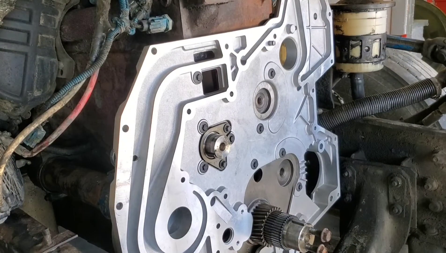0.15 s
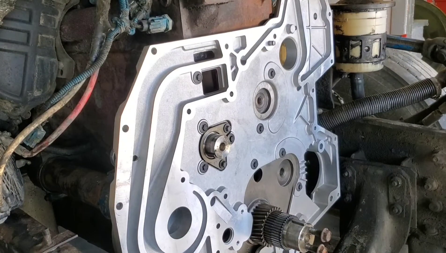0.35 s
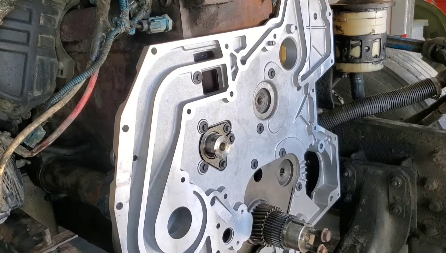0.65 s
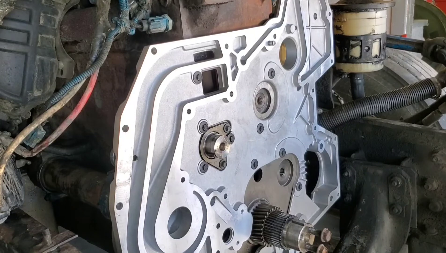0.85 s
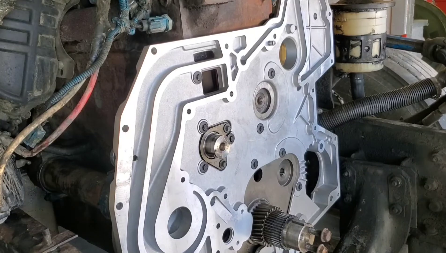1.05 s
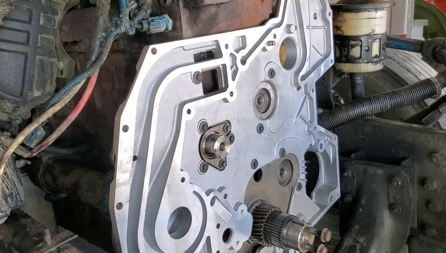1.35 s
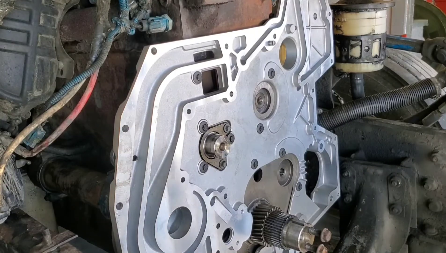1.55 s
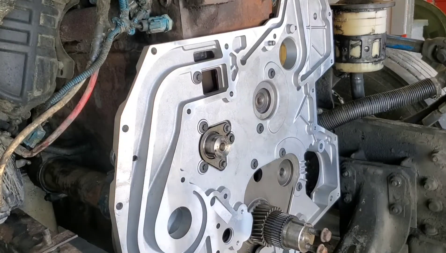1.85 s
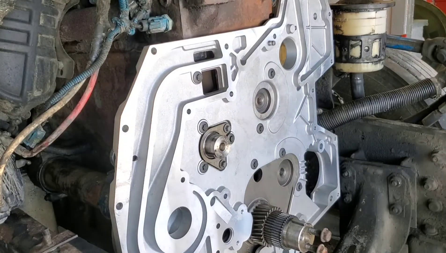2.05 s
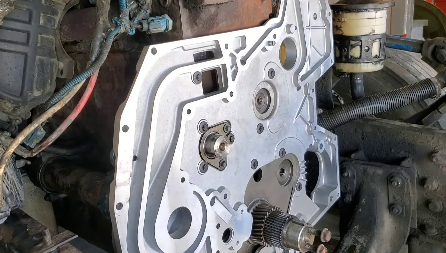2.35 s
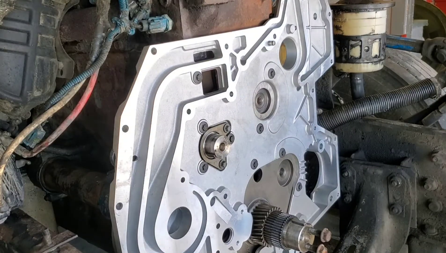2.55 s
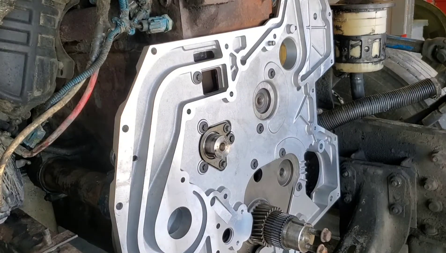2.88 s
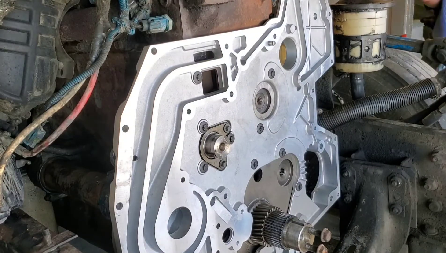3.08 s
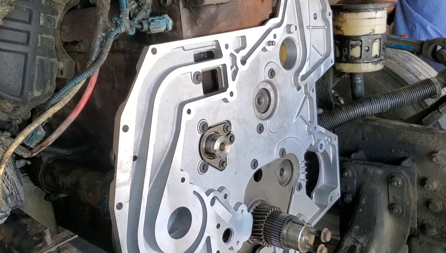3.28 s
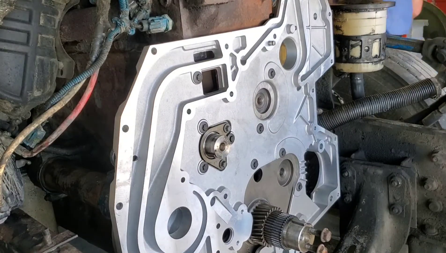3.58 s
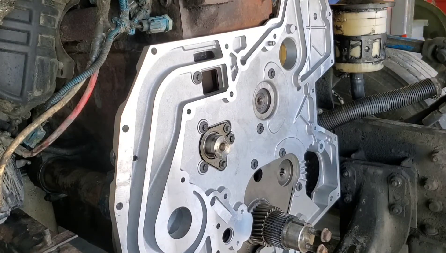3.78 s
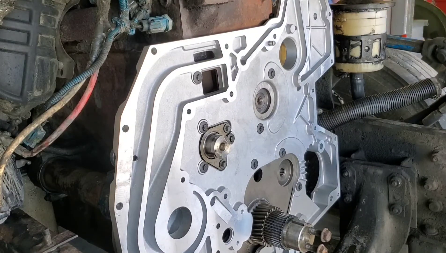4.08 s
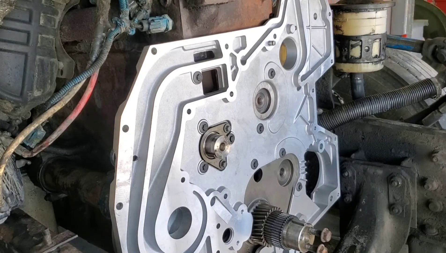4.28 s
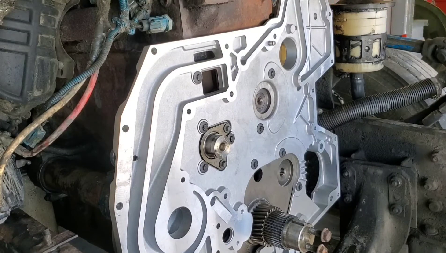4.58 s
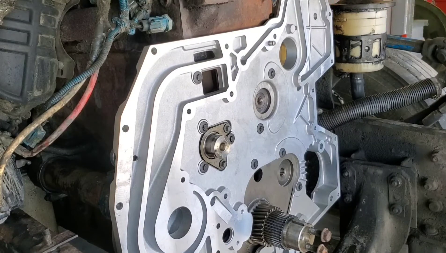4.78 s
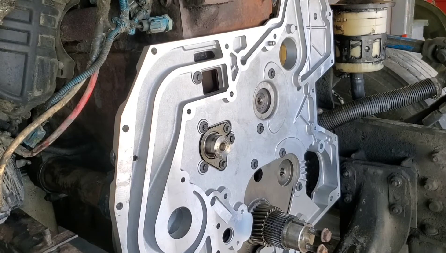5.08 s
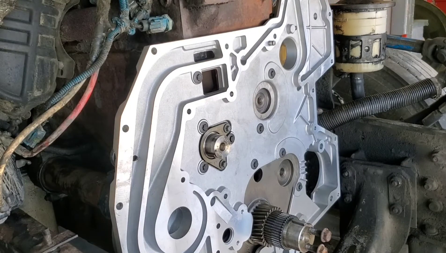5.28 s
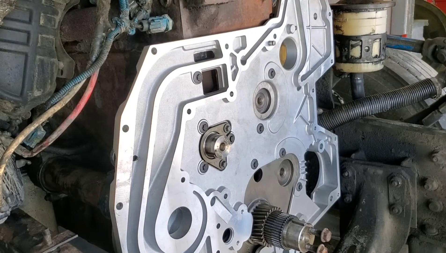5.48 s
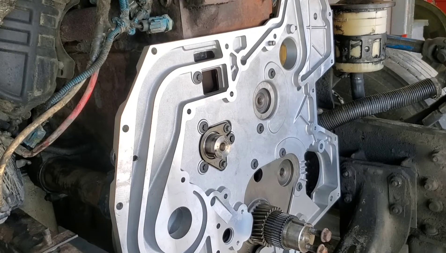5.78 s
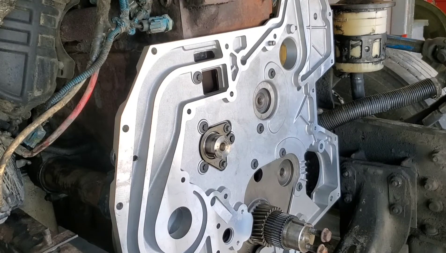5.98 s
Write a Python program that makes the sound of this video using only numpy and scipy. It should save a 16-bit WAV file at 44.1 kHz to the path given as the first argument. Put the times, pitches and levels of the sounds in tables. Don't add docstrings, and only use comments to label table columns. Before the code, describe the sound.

Workshop hum with soft cloth rustle and light metal ticks, faint sparrow chirps, then a dull clattering knock and scrape of heavy metal.

```python
import sys
import numpy as np
from scipy import signal
from scipy.fft import rfft, irfft, next_fast_len
from scipy.io import wavfile
from scipy.ndimage import uniform_filter1d

SR = 44100
rng = np.random.default_rng(int(sys.argv[2]) if len(sys.argv) > 2 else 0)


def transcribe(u):
    v = np.clip(np.atleast_2d(u).T, -1, 1)
    q = np.round(v * 32767).astype(np.int16)
    wavfile.write(sys.argv[1], SR, q)


def how_loud(loudness_db):
    steps = np.asarray(loudness_db, float) / 20
    return 10 ** steps


N = 270523
T = np.arange(N) / SR


def unit(x):
    return x / np.sqrt(np.mean(x ** 2))


def colour(x, table):
    size = next_fast_len(N)
    hz, db = np.transpose(table)
    bins_hz = np.arange(size // 2 + 1) * SR / size
    gain = how_loud(np.interp(np.log(bins_hz + 1), np.log(hz), db))
    return irfft(rfft(x, size) * gain, size)[..., :N]


def band(x, lo_hz, hi_hz):
    sos = signal.butter(2, [lo_hz, hi_hz], "band", fs=SR, output="sos")
    return unit(signal.sosfilt(sos, x))


def walk(rate_hz):
    k = int(SR / rate_hz)
    held = np.repeat(rng.standard_normal(N // k + 1), k)
    return 1.65 * uniform_filter1d(uniform_filter1d(held, k), k)[:N]


def grit(rate_hz, scatter_db, tail_s, bed):
    happens = rng.random(N) < rate_hz / SR
    slips = happens * how_loud(scatter_db * np.minimum(rng.exponential(size=N), 2))
    gate = signal.lfilter([1], [1, -np.exp(-1 / (tail_s * SR))], slips)
    return rng.standard_normal((2, N)) * (bed + unit(gate))


def even(x, span_s):
    return x / np.sqrt(uniform_filter1d(x ** 2, int(span_s * SR)) + 0.00103)


def modes(x, table, steady_s=0.54, count=1):
    out = 0
    for hz, db, t60 in table:
        r = np.exp(-np.log(1000) / (t60 * SR))
        poles = [1, -2 * r * np.cos(2 * np.pi * hz / SR), r * r]
        ring = x
        for _ in range(count):
            ring = unit(signal.lfilter([1, 0, -1], poles, ring))
        out = out + how_loud(db) * even(ring, steady_s)
    return unit(out)


def swells(starts, holds, dbs, rise_db_s, fall_db_s, bite_s=0, bite_db=0):
    t = T[::64]
    on = np.array(starts)[:, None]
    release = on + bite_s + np.array(holds)[:, None]
    dig = bite_db * np.clip(1 - (t - on) / max(bite_s, 1e-4), 0, 1)
    rise = rise_db_s * np.maximum(on - t, 0)
    fall = fall_db_s * np.maximum(t - release, 0)
    gains = how_loud(np.array(dbs)[:, None] + dig - rise - fall)
    return np.interp(T, t, gains.sum(axis=0))


def compressor():
    # (t/s, turns per second/Hz)
    shaft = [(0, 12.291), (1.3, 12.283), (2.7, 12.274), (4, 12.262), (6.14, 12.254)]
    orders = [(3, -83), (4, -41), (5, -74), (6, -91), (7, -61.5), (8, -40), (9, -56.5), (10, -65),
              (11, -59), (12, -53.5), (13, -61), (14, -66.5), (15, -63), (16, -69), (17, -60), (19, -58),
              (20, -62), (21, -56), (23, -71), (25, -64.5), (26, -85), (27, -62), (28, -68), (30, -74.5),
              (32, -68.5), (34, -104.5)]
    first_stroke_s, stroke_skew_rad = .0084, .49
    speed_hz = np.interp(T, *np.transpose(shaft))
    angle = 2 * np.pi * (np.cumsum(speed_hz) / SR - shaft[0][1] * first_stroke_s)
    out = 0
    for k, db in orders:
        start = rng.random() * 2 * np.pi
        if k % 4 == 0:
            start = np.pi + stroke_skew_rad
        out = out + how_loud(db + 0.51 * walk(2.4)) * np.sqrt(2) * np.cos(k * angle + start)
    return out


def fan():
    # (f/Hz, rms level/dB)
    tones = [(40, -60.5), (59.3, -59), (74.8, -66), (80.1, -50), (120, -71.5), (240, -70.5), (292, -64.5),
             (339.1, -70), (1621, -89), (5761, -80)]
    out = 0
    for hz, db in tones:
        level = how_loud(db + 1.2 * walk(2.8))
        out = out + level * np.sqrt(2) * np.cos(2 * np.pi * (hz * T + rng.random()))
    return out


def air():
    # (f/Hz, level/dB per Hz)
    air_colour = [(25, -27), (45, -4), (72, 0), (105, -0.5), (150, -9), (250, -16), (430, -15),
                  (800, -17.5), (1240, -25), (1570, -24), (3260, -32), (5280, -44), (6800, -45),
                  (7600, -55), (15500, -64)]
    # (f/Hz, level/dB, t60/s)
    duct_modes = [(1487, 0, 0.068), (1615, 1, 0.13), (1992, 1.5, 0.026), (3280, -14, 0.024)]
    white = rng.standard_normal((3, N))
    noise = unit(colour(white, air_colour))
    low = signal.sosfilt(signal.butter(2, 400, fs=SR, output="sos"), noise)
    ducts = how_loud(-18.5) * band(modes(white[::-1], duct_modes), 1270, 3500)
    bass = low * how_loud(2.4 * walk(2.3))
    treble = (noise - low + ducts) * how_loud(.5 * walk(7.8))
    return how_loud(-49) * (bass + treble)


def cloth_gains(moves, rise_db_s, falls_db_s):
    s, held, rub_db, hiss_db, fine_db = np.transpose(moves)
    swish_db = -61 + 0.41 * (rub_db + 54.5)
    levels = rub_db, rub_db + hiss_db, rub_db + hiss_db + fine_db, swish_db
    return np.array([swells(s, held, db, rise_db_s, fall) for db, fall in zip(levels, falls_db_s)])


def cloth():
    # (f/Hz, level/dB per Hz)
    fibre_colour = [(300, -4), (700, -6), (1400, -6.5), (2500, -1), (4000, -3), (6500, -13), (7500, -21),
                    (9500, -19.5), (12000, -28.5), (15500, -27.5)]
    # (t fully on/s, held/s, rub level/dB, hiss against rub/dB, fine hiss against hiss/dB)
    snap_moves = [(.205, 0.02, -63.5, -7.5, -18), (.512, 0.03, -65.5, -7.5, -17),
                  (.775, 0.047, -59.5, -13, -9), (1.218, 0.0088, -69.5, -10, -14),
                  (1.268, 0.0095, -76, -28, -10), (1.355, 0.036, -61, -8.5, -2),
                  (1.548, 0.012, -56, -19, 1), (1.45, 0.1, -71.5, -10, -12), (1.82, 0.072, -71, -5.5, -13),
                  (2.27, 0.015, -68.5, -9.5, -4), (3.04, 0.046, -65.5, -12.5, -7.5),
                  (3.9, 0.078, -69.5, -10, -5), (4.572, 0.057, -58.5, -16, -9), (6.102, .03, -60.5, -8, -4)]
    stroke_moves = [(0, 0.013, -65, -2, -2), (.12, 0.057, -78, -4, -11), (.34, 0.037, -73, 0, -9),
                    (.45, 0.048, -74.5, -4, -8), (.6, 0.15, -62.5, -13.5, -4),
                    (1.05, 0.036, -73, -1.5, -13), (2.15, 0.027, -61.5, -11, -4.5),
                    (2.46, .05, -78.5, -26, -5), (2.66, .13, -72, -14.5, 1), (3.33, 0.13, -64, -17, -2.5),
                    (3.66, 0.042, -67, -23.5, -2), (4.0, 0.043, -59.5, -8.5, -10),
                    (4.165, 0.041, -59, -3, -3.5), (4.25, 0.088, -44, -29.5, 5.5),
                    (4.31, 0.054, -56.5, -5.5, -1), (5.7, 0.095, -75, -23, -9),
                    (5.936, 0.21, -58.5, -11, -11)]
    fibres = colour(grit(1200., scatter_db=3., tail_s=.001, bed=1.5), fibre_colour)
    snaps = cloth_gains(snap_moves, rise_db_s=1600, falls_db_s=(107, 101, 150, 64))
    strokes = cloth_gains(stroke_moves, rise_db_s=195, falls_db_s=(156, 150, 200, 70))
    rub, hiss, fine, swish = snaps + strokes
    out = rub * band(fibres, 1250, 6800) - hiss * band(fibres, 6800, 10800)
    return out + fine * band(fibres, 10800, 18000) - swish * band(fibres, 330, 1250)


def ticks():
    # (t/s, peak level/dB, ring f/Hz, decay t60/s, bright edge level/dB)
    finger_ticks = [(0.2038, -37, 2480, 0.027, -10), (0.511, -40, 3220, 0.066, -22),
                    (0.568, -46.5, 2200, 0.023, -28), (0.6065, -43, 2790, 0.029, -27),
                    (0.6374, -43, 3420, 0.03, -22), (0.6636, -38, 2240, 0.03, -20),
                    (0.7196, -33.5, 2610, 0.026, -30), (0.776, -37, 2530, 0.024, -32),
                    (1.2183, -41, 1600, 0.057, -19), (1.2314, -56, 1900, 0.03, -21),
                    (1.27, -38.5, 3470, 0.034, -42), (1.3545, -33.5, 3250, 0.019, -12),
                    (1.394, -37, 3250, 0.019, -30), (1.445, -44, 3300, 0.036, -25),
                    (1.515, -48, 3200, 0.027, -28), (1.5484, -29, 2130, 0.046, -23),
                    (1.5614, -32, 2800, 0.04, -35), (1.575, -34, 3260, 0.035, -13),
                    (2.173, -42, 2620, 0.041, -30), (4.5724, -47, 2270, 0.027, -32),
                    (6.1, -49, 2200, 0.032, -14)]
    length = 4096
    out, t = np.zeros((3, N + length)), np.arange(length) / SR
    for s, db, hz, t60, edge_db in finger_ticks:
        burst = rng.standard_normal((3, length)) * np.exp(-np.log(1000) * t / max(t60, .005))
        ring = band(band(burst, hz * .72, hz * 1.35), 900, 5500)
        ring = ring + how_loud(edge_db) * band(burst, 7500, 11000)
        first = int(s * SR)
        out[:, first:first + length] += how_loud(db - 4.5) * ring / np.abs(ring).max()
    return out[:, :N]


def bumps():
    # (t/s, level/dB, f/Hz, t60/s)
    pushes = [(.625, -49, 436, 0.19), (1.218, -47, 1360, 0.071), (1.44, -51, 500, .15),
              (2.155, -57, 3250, .15), (1.551, -46, 3220, .12), (1.565, -46, 2750, .1),
              (4.575, -47, 1510, 0.13), (4.872, -32, 558, 0.13), (4.875, -38, 756, .12),
              (4.905, -41, 1026, .15), (5.212, -37, 640, 0.13), (5.214, -34.5, 1390, 0.15),
              (5.255, -39, 826, .15), (5.305, -36.5, 1395, 0.13), (5.505, -37.5, 285.6, .35),
              (5.508, -44, 742, .2), (5.825, -44, 358, 0.43), (5.951, -44, 296, 0.42),
              (5.985, -46, 372, .4), (5.98, -50, 518, 0.28)]
    push_s = 0.0025
    out = np.zeros((2, N))
    for (s, db, hz, t60), start in zip(pushes, rng.random((len(pushes), 2, 1))):
        k = slice(int(s * SR), int((s + t60) * SR))
        after = np.maximum(T[k] - s, 0)
        push = 1 - np.exp(-after / push_s)
        out[:, k] += push * how_loud(db - 60 * after / t60) * np.sin(2 * np.pi * (hz * after + start))
    return out


def sparrows():
    # (t/s, length/s, from f/Hz, to f/Hz, level/dB)
    notes_sung = [(1.797, 0.046, 3230, 3190, -62), (2.238, 0.026, 4620, 4220, -61),
                  (2.28, .065, 4160, 4150, -75), (2.34, .045, 4280, 4230, -63),
                  (2.38, .045, 4170, 4350, -74), (4.038, 0.031, 4420, 4180, -53),
                  (4.08, 0.052, 4120, 4050, -64), (4.15, .03, 4130, 4070, -57),
                  (4.181, 0.046, 3780, 3460, -51.5), (5.472, 0.06, 4520, 4200, -60),
                  (5.525, .05, 4080, 4000, -66), (5.578, .05, 4030, 3880, -62)]
    out, waver = np.zeros(N), 1 + .006 * walk(90)
    for s, length, from_hz, to_hz, db in notes_sung:
        k = np.arange(int(s * SR), int((s + length) * SR))
        done = np.linspace(0, 1, len(k))
        pitch = (from_hz + (to_hz - from_hz) * done) * waver[k]
        out[k] += how_loud(db) * np.sin(np.pi * done) ** 1.3 * np.cos(2 * np.pi * np.cumsum(pitch) / SR)
    hall = rng.standard_normal((2, 4000)) * np.exp(-np.arange(4000) / SR / .02) * how_loud(-29)
    hall[:, 0] = np.sqrt(2)
    return signal.fftconvolve(out[None], hall, axes=1)[:, :N]


def bench():
    # (f/Hz, level/dB, t60/s)
    low_modes = [(77, -4, .7), (89, -4, .7), (104, 0, .7), (111, -7, .6)]
    upper_modes = [(150, -2, .7), (184, 0, .7), (211, -3, .8), (244, -15, .5)]
    # (t fully on/s, held/s, low modes level/dB, upper modes level/dB)
    booms = [
        (4.862, 0.017, -30.5, -32),
        (4.914, .1, -31, -35),
        (5.15, 0.01, -31, -53),
        (5.22, 0.039, -31.5, -30),
        (5.362, 0.02, -27.5, -32),
        (5.528, 0.0067, -32, -37.5),
        (5.67, 0.016, -48, -50.5),
    ]
    # (t/s, held/s, level/dB)
    shifts = [
        (3.95, 0.098, -41),
        (4.22, 0.008, -37.5),
        (4.39, .02, -45),
        (4.66, 0.11, -47.5),
        (5.88, 0.013, -31),
        (6.02, 0.013, -38.5),
    ]
    shake = rng.standard_normal((2, N))
    s, held, *levels = np.transpose(booms)
    low, upper = (swells(s, held, db, rise_db_s=450, fall_db_s=149) for db in levels)
    boom = low * modes(shake, low_modes, .1, count=2)
    boom = boom + upper * modes(shake, upper_modes, .1, count=2)
    weight = swells(*np.transpose(shifts), rise_db_s=137, fall_db_s=140)
    boom += weight * even(band(shake, 64, 104), .08)
    return signal.sosfilt(signal.butter(3, [62, 420], "band", fs=SR, output="sos"), boom)


def heavy_part():
    # (f/Hz, level/dB, t60/s)
    middle_modes = [(266, -6.5, 0.22), (306, 0, 0.28), (350.6, -3, 0.27), (387.4, -2.5, .3),
                    (469, -7.5, 0.15), (546, -9.5, 0.19), (620, -9, 0.11), (763, -8, 0.17),
                    (828, -9.5, 0.23)]
    clang_modes = [(920, 1, 0.33), (1180, -20, 0.081), (1410, -6, 0.062), (1443, 12, 0.07),
                   (1875, -10, 0.19), (2062, -26, 0.11), (2320, -20, 0.18), (2700, 8.5, 0.032),
                   (2990, 9, 0.15), (3100, 3, 0.091), (3880, -3, 0.28)]
    # (f/Hz, level/dB per Hz)
    scrape_colour = [(250, 22), (500, 1), (830, -6), (1130, -6), (1500, -2), (3200, -8), (5000, -13.5),
                     (8000, -20.5), (12000, -29), (15500, -39)]
    # (t of contact/s, held/s, scrape level/dB, middle ring level/dB, hiss level/dB)
    knocks = [
        (4.858, 0.043, -38, -34.5, -49),
        (5.209, 0.011, -39.5, -38, -54.5),
        (5.292, 0.059, -51, -40.5, -68.5),
        (5.5, 0.0033, -54.5, -41.5, -64.5),
    ]
    chatter = grit(500., scatter_db=2.5, tail_s=.003, bed=2.2)
    s, held, scrape_db, ring_db, hiss_db = np.transpose(knocks)
    rise_db_s, bite_s = 2500, 0.029
    scrape = swells(s, held, scrape_db, rise_db_s, 108.5, bite_s, bite_db=-6.5)
    ring = swells(s, held, ring_db, rise_db_s, 111, bite_s, bite_db=-2.5)
    hiss = swells(s, held, hiss_db, rise_db_s, 140, bite_s, bite_db=-15)
    rough = colour(chatter, scrape_colour)
    high = how_loud(-8) * band(modes(chatter, clang_modes), 900, 4500) + band(rough, 950, 5500)
    middle = how_loud(-2.5) * modes(chatter, middle_modes, .08, count=2) - how_loud(-5.5) * band(rough, 420, 950)
    return scrape * high + ring * middle - hiss * band(rough, 7500, 16200)


def scene():
    # (f/Hz, level/dB)
    width = [(30, -20), (60, -12), (110, -24.5), (200, -16.5), (380, -7.5), (700, -1.5), (1290, 2.5),
             (2380, -1.5), (4400, 0.5), (8120, 0), (15000, 0.5)]
    lag, left_db = 7, -1.0
    *spread, straight = air() + ticks()
    mid, side = spread + cloth() + heavy_part() + bench() + sparrows() + bumps()
    side = colour(side, width)
    direct = compressor() + fan() + how_loud(-9.5) * straight
    left = mid + side + np.roll(direct, lag)
    right = mid - side + np.roll(direct, -lag)
    return np.array([left * how_loud(left_db / 2), right * how_loud(-left_db / 2)])


def low_pass(x):
    return signal.sosfilt(signal.butter(12, 15740, fs=SR, output="sos"), x)


def record(dry):
    return low_pass(dry)


dry = scene()
out = record(dry)
transcribe(out)
```